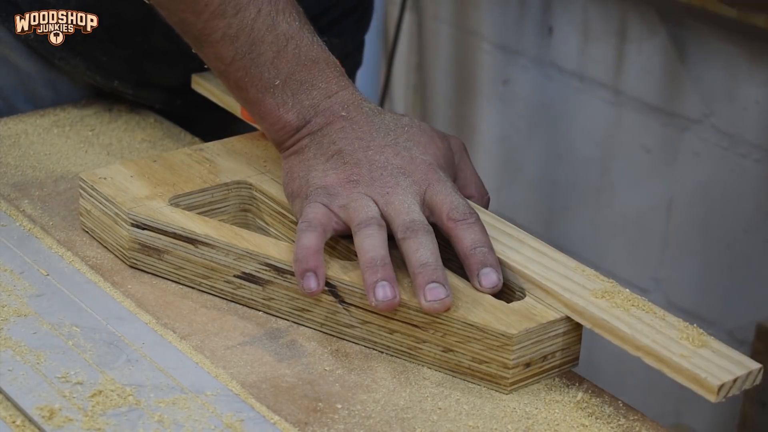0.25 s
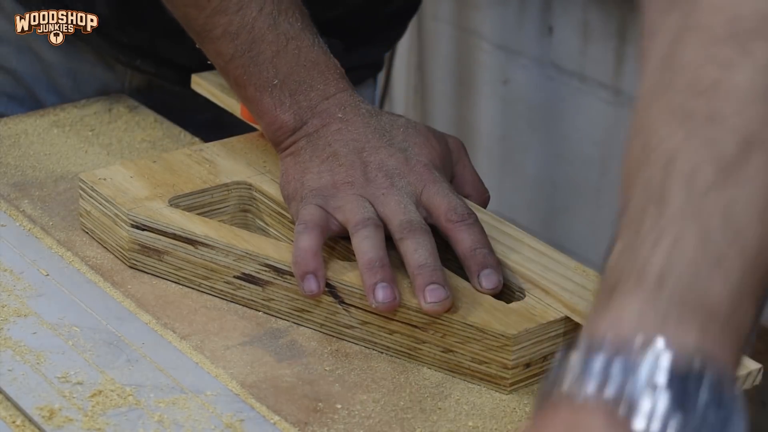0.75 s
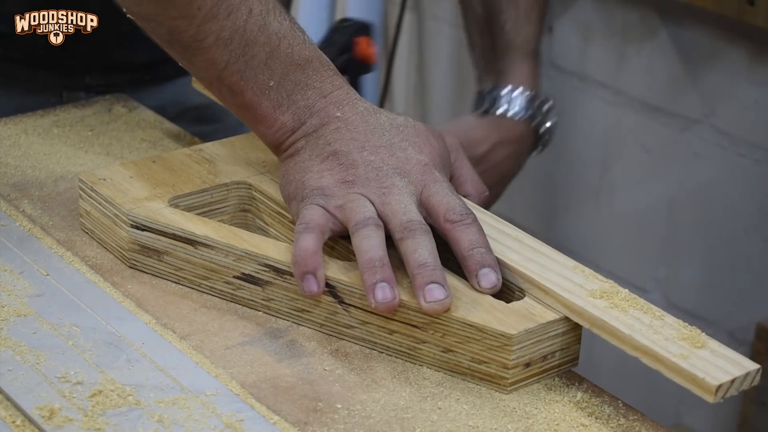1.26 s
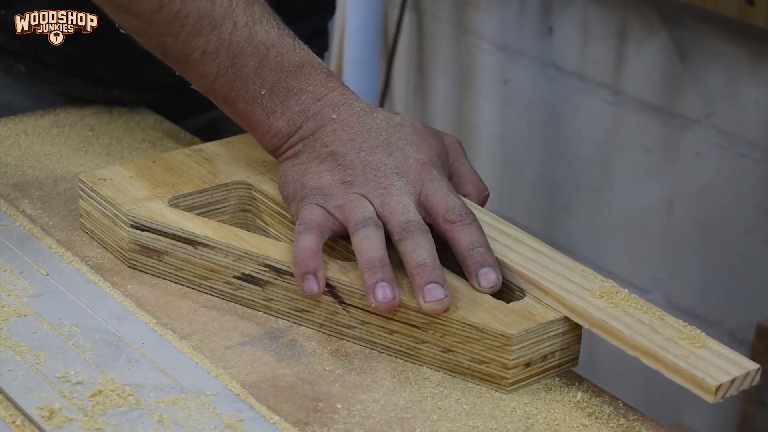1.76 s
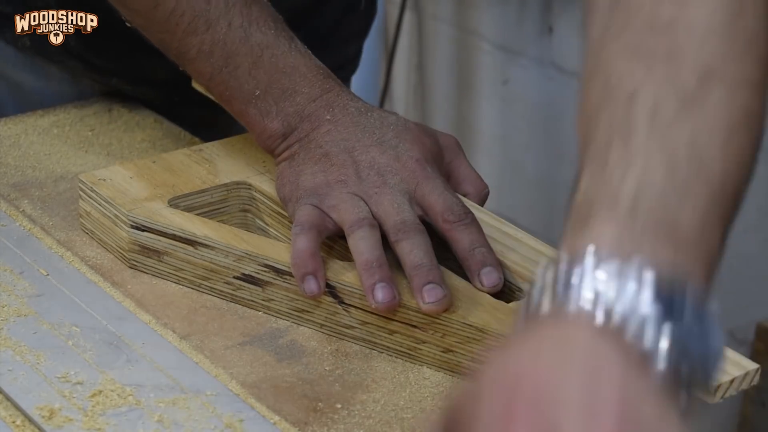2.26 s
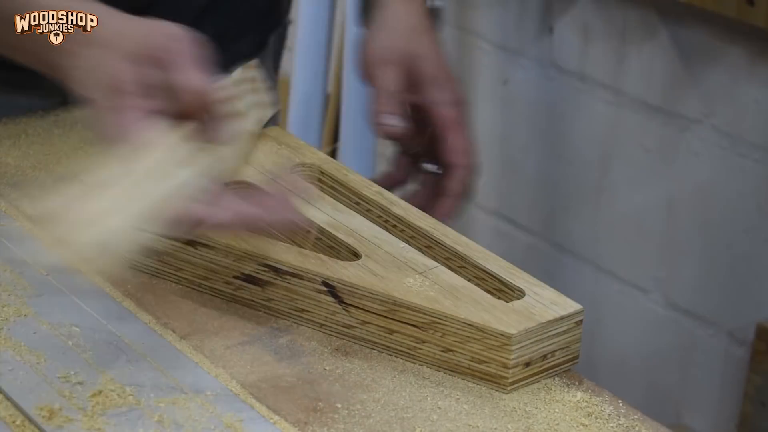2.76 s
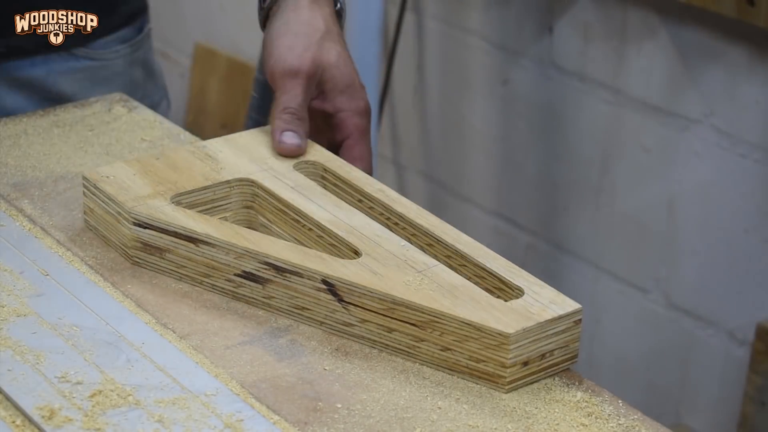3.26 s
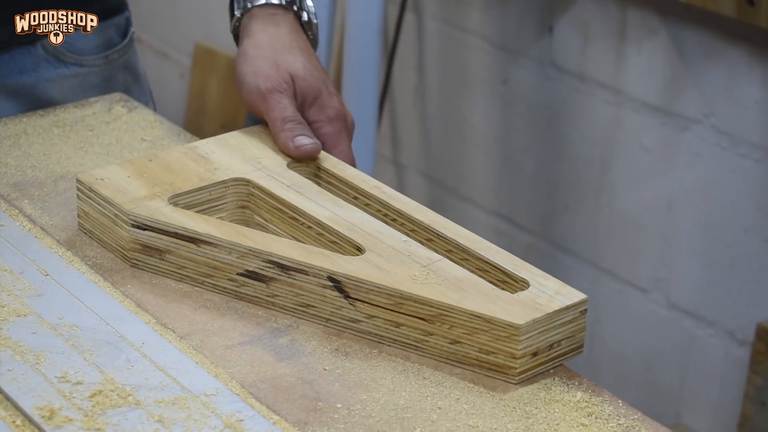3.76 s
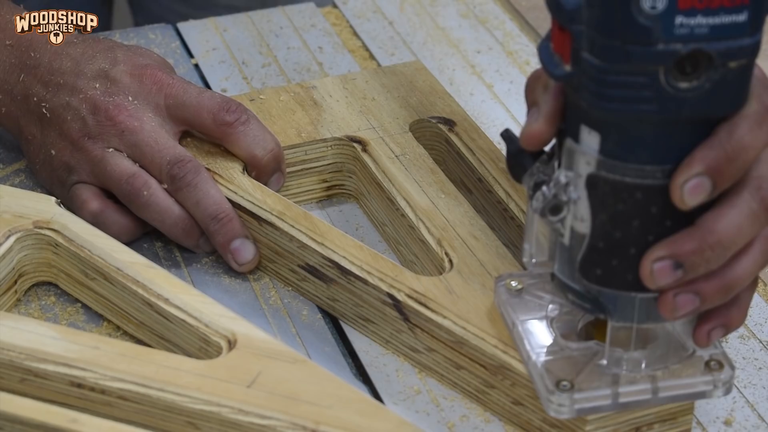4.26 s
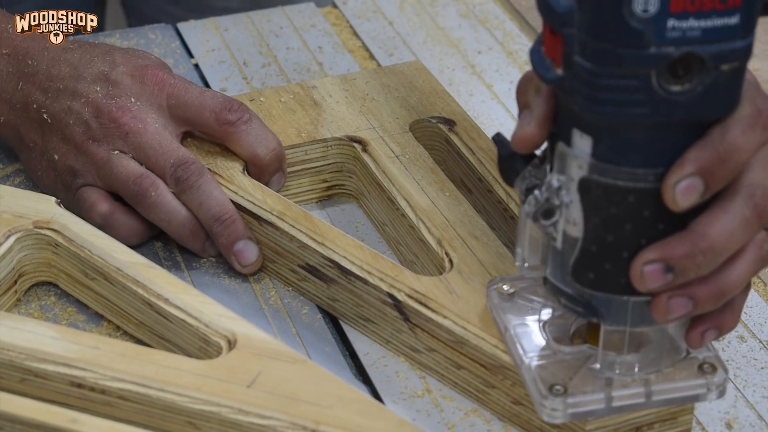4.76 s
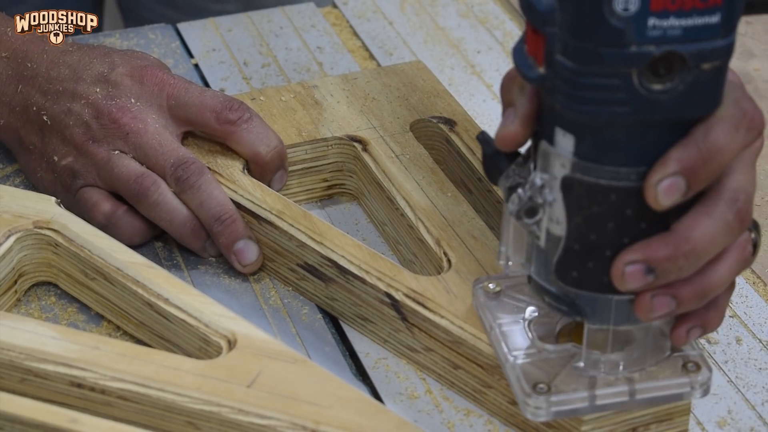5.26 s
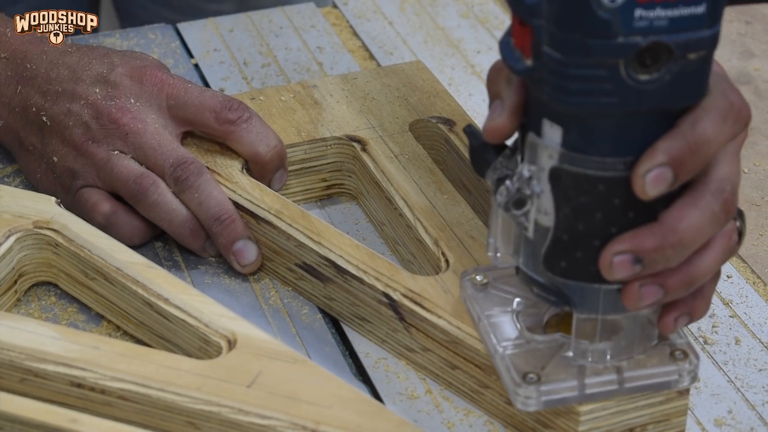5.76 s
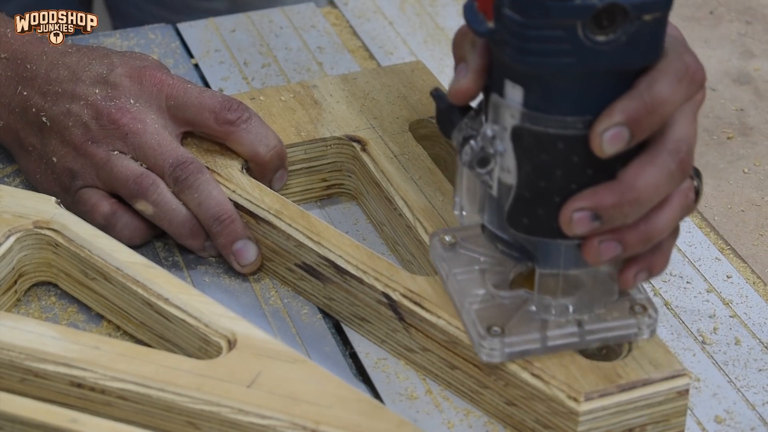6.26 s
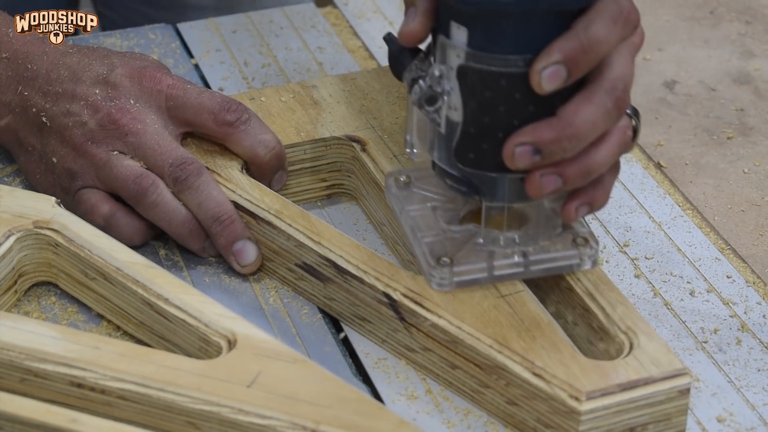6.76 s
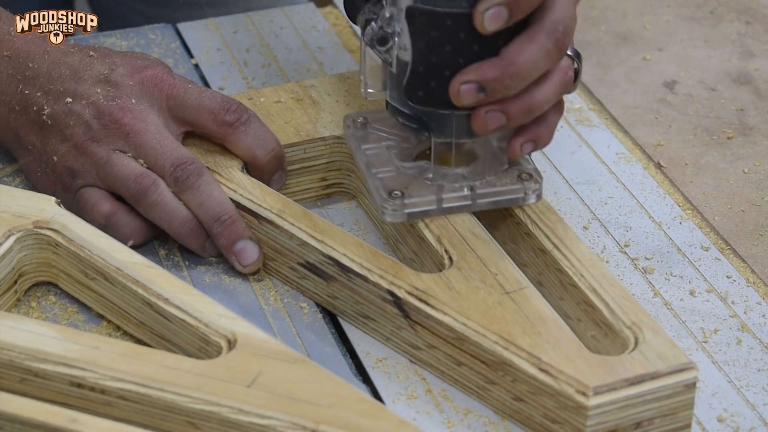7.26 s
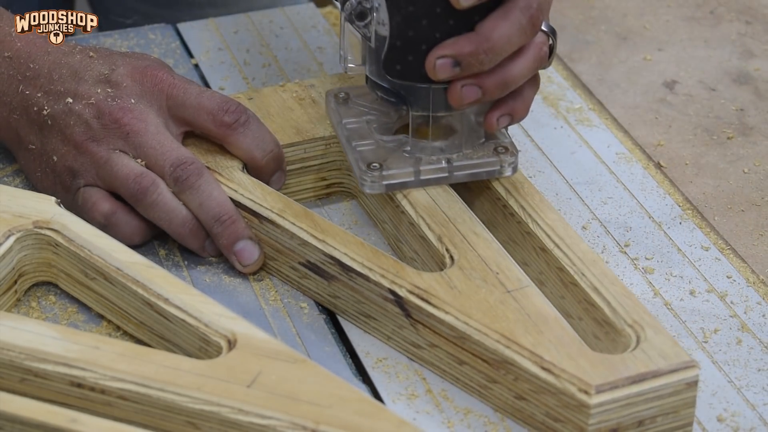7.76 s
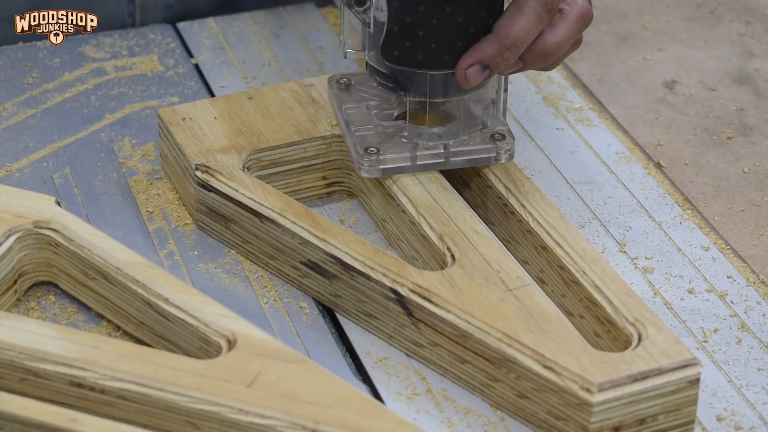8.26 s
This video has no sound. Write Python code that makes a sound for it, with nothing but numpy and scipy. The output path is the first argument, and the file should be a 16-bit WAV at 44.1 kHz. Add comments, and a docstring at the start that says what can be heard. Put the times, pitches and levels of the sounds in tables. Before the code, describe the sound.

A clamp bar clacks amid bursts of wooden knocks, hands brush plywood, then a router abruptly screams at high pitch before dropping into a falling run-down.

```python
"""Trim router in a workshop

At a workshop bench a clamp is let go, its bar clacking, and wood knocks, scrapes and is brushed by hands.
Knocks are noise bursts with a wall echo; scrapes are stick-slip pulses shaking a board's resonances.
Then a trim router whines along an edge: partials follow a shifting shaft speed over the hiss of chips.
The working whine breaks off and the run-down is heard from a third of that speed. One microphone, mono."""
import sys
import numpy as np
from scipy import signal
from scipy.fft import rfft, irfft, next_fast_len
from scipy.io import wavfile
from scipy.ndimage import map_coordinates

SR = 44100
rng = np.random.default_rng(int(sys.argv[2]) if len(sys.argv) > 2 else 0)


def bounce(signal):
    """Save signal as a 16-bit WAV file at the path given by the first command-line argument."""
    frames = np.transpose(np.atleast_2d(signal))
    limited = np.clip(frames, -1, 1)
    pcm = np.round(limited * 32767).astype(np.int16)
    wavfile.write(sys.argv[1], SR, pcm)


N = 374850

BREAK_S = 1.025  # knocks, scrapes and their echoes begun before this stop dead here
ON_S, WHINE_END_S = 4.228, 7.965  # the working whine begins and breaks off

# The whine's pitch sinks, climbs, dips and climbs again. Each row: time in seconds, shaft speed in Hz.
SHAFT_SPEED = [(4.25, 486.3), (4.49, 465.7), (4.73, 460.1), (5.2, 457.6), (5.68, 490.6), (5.8, 493.3),
               (5.92, 492.1), (6.27, 475.2), (6.63, 465.8), (6.99, 474), (7.46, 495), (7.94, 504.6)]
# Partials of the whine. Each row: order (multiple of shaft speed), rms level in dB with the router
# near the tip, rms level in dB at the far end of the edge; both before drift and standing waves.
WHINE_PARTIALS = [(2, -40.3, -41.5), (2.9964, -33.5, -41.5), (4.007, -40, -41.5), (5, -44.5, -37.5),
                  (6.002, -43.5, -53), (8, -47.5, -46), (12, -50, -48.5), (16, -46.5, -48),
                  (23.95, -61, -54)]
# The lowest partial, before its drift. Each row: time in seconds, rms level in dB.
FUNDAMENTAL_LEVEL = [(4.25, -42), (5.02, -43.5), (5.31, -51), (6.17, -45), (6.24, -56), (6.36, -49),
                     (6.84, -48.5), (7.15, -33), (7.26, -45), (7.33, -33.5), (7.82, -30), (7.94, -32)]
# The other partials, before the bench mix. Each row: frequency in Hz, amplitude in dB.
MOTOR_SPECTRUM = [(3200, -42.5), (3800, -30), (4400, -42.5), (5500, -42.5), (7000, -44.5), (9000, -46.5),
                  (10500, -53), (12500, -58), (15800, -69)]
# Colour of chips and cooling air. Each row: frequency in Hz, relative density in dB per Hz.
CHIP_SPECTRUM = [(60, -51), (130, -34), (200, -27.5), (320, -18.5), (520, -5.5), (900, 0), (1500, -1),
                 (2400, 2), (3600, 1.5), (5200, -3), (8700, -0.5), (10200, -12), (13000, -19), (15800, -24)]
# Level of that hiss, before its drift. Each row: time in seconds, rms level in dB.
HISS_LEVEL = [(4.25, -39.5), (4.6, -41), (5.2, -39), (5.3, -38.5), (6.95, -39), (7.15, -36.5)]
FAR_END_S, FAR_END_RAMP_S = 6.83, 0.28  # the router slides into its second position
FAR_MOTOR_DB = -4  # change of the other partials in that position


def router(count=33):
    """Partials at or near multiples of shaft speed glide through standing waves, over chip and air hiss."""
    speed, = curves(SHAFT_SPEED)
    far = np.clip((clock() - FAR_END_S) / FAR_END_RAMP_S, 0, 1)
    angle = 2 * np.pi * np.cumsum(speed * (1 + .0005 * drift(45))) / SR

    def partial(order):
        """One sine locked to the shaft, at a random phase."""
        return np.sin(order * angle + rng.uniform(0, 2 * np.pi))

    whine = np.zeros(N)
    for order, near_db, far_db in WHINE_PARTIALS:
        level_db = near_db + (far_db - near_db) * far + 1.8 * drift(20)
        whine += np.sqrt(2) * amp(level_db) * standing_waves(order * speed) * partial(order)
    lowest_db = curves(FUNDAMENTAL_LEVEL)[0] + 0.77 * drift(14)
    whine += np.sqrt(2) * amp(lowest_db) * partial(1)

    strong_orders = [row[0] for row in WHINE_PARTIALS]
    others = [order for order in range(2, count) if order not in strong_orders]
    motor = sum(amp(along(MOTOR_SPECTRUM, order * speed.mean())) * partial(order) for order in others)
    # near reflections make the gliding partials swell and drop out by turns
    bench = burst([(100, 0), (16000, 0)], t60=.17)
    reflected = signal.fftconvolve(motor, bench / np.linalg.norm(bench))[:N]
    motor = 0.38 * motor + 0.69 * reflected

    pulsing = rng.standard_normal(N) * (1 + 0.3 * np.sin(angle))  # once per turn
    hiss = filtered(pulsing, lambda hz: amp(along(CHIP_SPECTRUM, hz)))
    hiss = unit(hiss) * amp(curves(HISS_LEVEL)[0] + 0.74 * drift(6) + 0.23 * drift(30))
    return (whine + amp(FAR_MOTOR_DB * far) * motor + hiss) * during(ON_S, WHINE_END_S, 0.00089)


# Echo paths that change as the router moves.
# Each row: extra length in m, growth in m/s, reflected share before the common strength.
ECHO_PATHS = [(0.315, 0.124, 0.31), (0.849, 0.109, 0.23), (1.192, -0.084, 0.36), (3.581, 0.217, 0.4),
              (4.482, 0.135, 0.3), (6.367, -0.168, 0.17), (8.655, -0.037, 0.22), (12.277, -0.351, 0.17)]
PATHS_DB = 0.5  # common strength of these echoes


def standing_waves(hz):
    """Gain of a gliding tone that its own echoes reinforce and cancel by turns."""
    t, hz = clock()[::200], hz[::200]
    waves_per_m = hz / 343  # speed of sound in m/s
    echoes = 0
    for metres, growth, share in ECHO_PATHS:
        length = metres + growth * (t - ON_S)
        echoes = echoes + share * np.exp(-2j * np.pi * waves_per_m * length)
    return np.interp(clock(), t, np.abs(1 + amp(PATHS_DB) * echoes))


# Shaft, fan and commutator tones. Each row: order (multiple of shaft speed),
# amplitude in dB before housing, trim and run-down.
SPINNING_ORDERS = [(1, -63.5), (2, -71), (8, -57.5), (23, -51), (24, -42.5), (26, -51), (48, -47.5)]
# The motor housing colours the tones and buzz inside it. Each row: frequency in Hz, gain in dB.
HOUSING_GAIN = [(100, 0), (1300, 0), (2200, -4), (2850, -1), (3100, -9), (3750, 2), (4700, -7), (5700, 3),
                (6400, -1), (7200, -6), (8700, -4), (10500, -15), (16000, -20)]
# Colour of the bearing noise. Each row: frequency in Hz, relative density in dB per Hz.
BEARING_SPECTRUM = [(59, -46), (100, -30), (140, -7), (166, -19), (201, -40), (314, -11), (431, -14),
                    (479, -7), (1170, -3), (2110, -8), (3660, -8), (4530, -2), (5720, -9), (6770, -15),
                    (15800, -18)]
COAST_HZ, SLOWING_HZ_PER_S = 168, 101  # heard from a third of the working speed
COAST_DB, COAST_FADE_DB_PER_S = 3, 10.5


def coasting(count=110):
    """The shaft slows; its orders fall through the housing's resonances and beat with their echoes."""
    since = np.maximum(clock() - WHINE_END_S, 0)
    speed = COAST_HZ - SLOWING_HZ_PER_S * since
    level_db = COAST_DB - COAST_FADE_DB_PER_S * since
    tail = since > 0
    angle = 2 * np.pi * np.cumsum((speed * (1 + .0007 * drift(70)))[tail]) / SR

    def partial(order):
        """One order of the shaft, coloured by the housing."""
        sine = np.sin(order * angle + rng.uniform(0, 2 * np.pi))
        return amp(along(HOUSING_GAIN, order * speed[tail])) * sine

    tones, buzz = np.zeros((2, N))
    tones[tail] = sum(amp(db) * partial(order) for order, db in SPINNING_ORDERS)
    # brushes and bearings buzz at every multiple of the shaft speed from the fifth up
    buzz[tail] = sum(amp(rng.normal(-62.5, 4)) * partial(order) for order in range(5, count))
    tones = amp(-1.5) * tones * amp(2 * drift(25)) + amp(-6) * room(tones)
    buzz = amp(1.5) * buzz + amp(1.5 - 1.5) * amp(-9) * room(buzz)
    sound = tones + buzz + amp(-47) * noise(BEARING_SPECTRUM)
    return sound * amp(level_db) * during(WHINE_END_S, N / SR, .002)


# Wood knocking on wood. Each row: start in seconds, level in dB, then thud, body and crack in dB
# relative to that level (before each layer's trim), main resonance in Hz.
WOOD_KNOCKS = [(0.713, 2, -21, -8, -19, 1190), (0.740, -1, -30, -10, -15.5, 1450),
               (0.778, -8.5, -19, -6, -14, 1500), (0.854, -2, -16, -7, -30, 930),
               (0.861, -11, -25, -19, -12, 1200), (0.880, -9.5, -13, -9.5, -22, 545),
               (0.901, -11, -15.5, -8.5, -38, 810), (1.152, -38.5, -8, -5.5, -31, 905),
               (1.186, 0.5, -20.5, -10.5, -16.5, 707), (1.917, -34.5, -30, -7, -39, 1800),
               (2.143, -32.5, -34, -11, -11, 1070), (2.209, 1.5, -18, -10, -17.5, 1950),
               (2.228, 0, -18.5, -14, -14.5, 1760), (2.236, -1, -12, -8.5, -29, 440),
               (2.279, -3.5, -23, -9, -9.5, 1510), (2.331, -15, -17, -0.5, -30, 646),
               (2.381, -16, -9.5, -5.5, -32, 450), (2.582, -2.5, -13, -8, -24.5, 940),
               (2.665, -14, -14, -14, -20.5, 630), (3.632, -31, -3.5, -38, -40, 450)]


def knocks():
    """Each blow thuds in the bench, rings the wood around one main resonance and cracks at the contact."""
    out = np.zeros(N)
    grid = np.geomspace(30, SR / 2, 300)
    wood_db = along([(60, -64.5), (250, -2.5), (520, -0.5), (1100, -2), (2000, -5), (3200, -11.0),
                     (6000, -25.5), (12000, -77.5)], grid)
    thud_spectrum = [(30, -36.0), (110, -20), (215, 5), (370, 1.5), (650, -24), (2000, -66)]
    crack_spectrum = [(1500, -18), (4000, 7.5), (9000, 1.5), (15000, -20.5)]
    for s, db, thud_db, body_db, crack_db, ring_hz in WOOD_KNOCKS:
        peak_db = 10 / (1 + (np.log(grid / ring_hz) / 0.28) ** 2)
        body_spectrum = np.c_[grid, wood_db + peak_db]
        thud = blow(thud_spectrum, t60=0.053, echo_db=-8, echo_t60=0.46, attack_s=0.0018)
        body = blow(body_spectrum, t60=0.045, echo_db=-11.5, echo_t60=0.44, attack_s=0.00051)
        crack = blow(crack_spectrum, t60=0.043, echo_db=-11.5, echo_t60=0.37, attack_s=0.00018)
        sound = amp(db + thud_db + 1.5) * thud
        sound += amp(db + body_db + 3.5) * body
        sound += amp(db + crack_db - 2.0) * crack
        if s < BREAK_S:
            sound = sound[:round((BREAK_S - s) * SR)]
        add(out, s, sound)
    return out


def blow(spectrum, t60, echo_db, echo_t60, attack_s):
    """A short burst and its diffuse echo from the walls."""
    return burst(spectrum, t60, attack_s) + amp(echo_db) * burst(spectrum, echo_t60, attack_s=.003)


# Strokes of wood on wood. Each row: time of full strength in seconds, hold in seconds,
# judder level in dB, rasp level in dB.
WOOD_STROKES = [(0.777, 0.035, -21, -24), (2.256, 0.071, -23.5, -27.5)]
# Resonances of the scraped board. Each row: frequency in Hz, width in Hz, relative gain in dB.
BOARD_MODES = [(197, 53, 6), (377, 180, 4), (586, 85, 6.5), (853, 62, 3), (1060, 116, 2), (1520, 240, -3),
               (1880, 140, -7), (2600, 490, -5)]
# Colour of the dry rasp. Each row: frequency in Hz, relative density in dB per Hz.
RASP_SPECTRUM = [(710, -25.5), (1200, -13), (2240, -1), (2410, 19), (3760, -8), (4790, 2), (6310, -37.5),
                 (9520, -29), (10900, -39), (15000, -44)]
SCRAPE_ATTACK_S = 0.05
JUDDER_FADE_DB_PER_S, RASP_FADE_DB_PER_S = 146, 480  # as the push eases the rasp dies first


def scrapes():
    """Wood sticks and slips with uneven strength: the slips shake the board and gate a dry rasp."""
    turns = np.cumsum(280 * np.exp(.4 * drift(150))) / SR  # the slip rate varies around 280 Hz by draw
    slips = np.diff(np.floor(turns), prepend=0) * amp(2.5 * rng.standard_normal(N))
    grip = unit(signal.lfilter([1], [1, -np.exp(-1 / (0.0094 * SR))], slips))  # 9.4 ms decay constant
    push = grip * noise([(40, -34), (110, 10.5), (200, 2.5), (5000, 3.0), (12000, -23.0)])
    judder = unit(filtered(push, resonances(BOARD_MODES)))
    rasp = grip * noise(RASP_SPECTRUM)
    out = np.zeros(N)
    for s, held_s, judder_db, rasp_db in WOOD_STROKES:
        sound = amp(judder_db) * judder * stroke(s, held_s, SCRAPE_ATTACK_S, JUDDER_FADE_DB_PER_S)
        sound += amp(rasp_db) * rasp * stroke(s, held_s, SCRAPE_ATTACK_S, RASP_FADE_DB_PER_S)
        if s < BREAK_S:
            sound *= clock() < BREAK_S
        out += sound
    return out


# The jaw sliding on its bar, before trim and drift. Each row: time in seconds, level in dB.
JAW_SLIDE = [(1.29, -59), (1.35, -35.5), (1.415, -46), (1.45, -27.5), (1.48, -26), (1.499, -24.5)]
# Colour of that slide. Each row: frequency in Hz, relative density in dB per Hz.
BAR_SPECTRUM = [(180, -57.5), (300, -30), (568, -6), (869, -11), (1370, -4), (2100, -9.5), (7180, -16.5),
                (15000, -40)]
# The steel bar clacking. Each row: start in seconds, level in dB, then body and tick (before their
# trims) and echo in dB relative to that level.
BAR_CLACKS = [(0.002, -15.5, -22, -18, -3.5), (1.375, -21.5, -17, -15.5, -33),
              (1.498, 0.5, -12, -13, -17.5), (1.734, -26, -3, -18, -16.5), (2.019, -41, -30, -9, -21)]
# Modes of the bar. Each row: frequency in Hz, relative level in dB, 60 dB decay time in seconds.
STEEL_MODES = [(3149, -3, .15), (3714, -4, .15), (7892, -3, .15), (9950, -2, .28), (13400, -10, .24)]
# Colour of the clack's echo. Each row: frequency in Hz, relative density in dB per Hz.
CLANG_SPECTRUM = [(100, -33.5), (300, -14.5), (700, -9.5), (1300, 0.5), (2200, 0.5), (3000, 3.5),
                  (4200, -2), (5500, -5), (8500, -11.5), (11500, -23.5), (15500, -34)]


def clamp():
    """The jaw slides along the steel bar and clacks against its stop; a diffuse echo joins each clack."""
    slide_db = curves(JAW_SLIDE)[0] - 2.5 + 1.6 * drift(90)
    out = amp(slide_db) * noise(BAR_SPECTRUM) * during(JAW_SLIDE[0][0], JAW_SLIDE[-1][0], 0.0052)
    body_spectrum = [(100, -39), (350, -31), (800, -10), (1300, -1), (3000, -9), (4500, -5), (8000, -31.5)]
    for s, db, body_db, tick_db, echo_db in BAR_CLACKS:
        body = burst(body_spectrum, t60=0.041)
        tick = burst([(2500, -32), (5500, 7.0), (9000, 7), (15000, -18)], t60=0.033)
        tick += amp(-22) * ring(STEEL_MODES)
        shimmer = burst([(3000, -25), (6000, 7), (9500, 4.5), (15000, -14.5)], t60=0.22)
        bright = tick + amp(-14.5) * shimmer
        add(out, s, amp(db + body_db - 0.5) * body + amp(db + tick_db + 4.0) * bright)
        add(out, s, amp(db + echo_db) * burst(CLANG_SPECTRUM, t60=0.33))
    return out


# Light touches on steel. Each row: start in seconds, level in dB before the trim.
STEEL_TOUCHES = [(0.27, -46)]
# Modes they ring. Each row: frequency in Hz, relative level in dB, 60 dB decay time in seconds.
TOUCH_MODES = [(6270, 3, 0.054), (6580, 0, 0.098), (11200, -15, .08), (14700, -16, .06)]


def pings():
    """A light touch rings only high modes of the steel."""
    out = np.zeros(N)
    for s, db in STEEL_TOUCHES:
        add(out, s, amp(db - 3.5) * ring(TOUCH_MODES))
    return out


# Strokes of a hand or sleeve. Each row: time of full strength in seconds, hold in seconds,
# rub level in dB, swish level in dB, both before drift.
HAND_STROKES = [(0.45, 0.1, -80, -65.5), (0.64, 0.05, -58.5, -56), (1.93, 0.064, -69, -60.5),
                (2.18, 0.02, -73, -53.5), (2.73, 0.17, -60, -47), (3.08, 0.037, -53.5, -55.5),
                (3.2, 0.009, -55, -51.5), (3.29, 0.096, -57.5, -57.5), (3.44, 0.036, -51, -51.5),
                (3.6, 0.038, -60, -54.5), (3.72, 0.085, -58, -54.5), (3.975, 0.03, -85, -51),
                (4.07, 0.069, -77, -53.5), (4.21, 0.011, -55.5, -62)]
# Colour of the low rub. Each row: frequency in Hz, relative density in dB per Hz.
RUB_SPECTRUM = [(59, -38), (100, -14), (211, -3), (481, -7), (767, -10.5), (1120, -19), (1200, -7),
                (1560, -55.5), (2640, -120)]
# Colour of the bright swish. Each row: frequency in Hz, relative density in dB per Hz.
SWISH_SPECTRUM = [(410, -32), (700, -4.5), (1410, -0.5), (1500, -3), (1920, -2), (2630, 0), (2950, -5),
                  (3680, 0), (4130, -1.5), (8430, -5), (15500, -28.5)]
# Narrow resonant peaks in the swish. Each row: frequency in Hz, width in Hz, relative gain in dB.
SWISH_PEAKS = [(1540, 40, 0), (1780, 70, -11), (2620, 110, -6), (3590, 110, -6), (4640, 250, -8),
               (5800, 110, -7), (6830, 430, -9)]
BRUSH_ATTACK_S = 0.077
RUB_FADE_DB_PER_S, SWISH_FADE_DB_PER_S = 111, 79.5


def hands():
    """Palms and sleeves brush the plywood as coloured noise; narrow bands of noise colour the swish."""
    bands = np.zeros(N)
    for peak in SWISH_PEAKS:
        bands += amp(6 * drift(5)) * filtered(rng.standard_normal(N), resonances([peak]))
    rub = noise(RUB_SPECTRUM) * amp(1.5 * drift(40))
    swish = noise(SWISH_SPECTRUM) * amp(2.2 * drift(70) - 0.5) + unit(bands)
    rubbing, swishing = np.zeros((2, N))
    for s, held_s, rub_db, swish_db in HAND_STROKES:
        rub_stroke = amp(rub_db) * stroke(s, held_s, BRUSH_ATTACK_S, RUB_FADE_DB_PER_S)
        swish_stroke = amp(swish_db) * stroke(s, held_s, BRUSH_ATTACK_S, SWISH_FADE_DB_PER_S)
        # the stronger of overlapping strokes wins
        rubbing = np.maximum(rubbing, rub_stroke)
        swishing = np.maximum(swishing, swish_stroke)
    return (rubbing * rub + swishing * swish) * (clock() < ON_S)


def stroke(s, held_s, attack_s, fade_db_per_s):
    """A gesture swells to full strength at time s, holds and fades."""
    rise = np.clip((clock() - s) / attack_s + 1, 0, 1)
    return rise ** 2 * amp(-fade_db_per_s * np.maximum(clock() - s - held_s, 0))


# Decay of the workshop. Each row: frequency in Hz, 60 dB decay time in seconds.
ROOM_DECAY = [(100, 0.21), (400, 0.47), (1000, 0.34), (3000, 0.15), (8000, 0.38), (15000, 0.083)]


def room(x):
    """The walls' answer, each frequency dying at its own speed."""
    hz, t, z = signal.stft(rng.standard_normal(SR * 3 // 4), SR, nperseg=256)
    fall = amp(-60 * t / along(ROOM_DECAY, hz)[:, None]) * (1 - np.exp(-t / .008))
    tail = signal.istft(z * fall, SR, nperseg=256)[1]
    return signal.fftconvolve(x, tail / np.linalg.norm(tail))[:N]


# Colour of the still room. Each row: frequency in Hz, relative density in dB per Hz.
AIR_SPECTRUM = [(20, 15), (60, 3), (120, -2.5), (220, 0.5), (600, 1), (1700, -3), (3000, -12.5),
                (8000, -19.5), (16000, -24)]


def air():
    """Steady coloured noise of the room, present until the router starts."""
    return amp(-56.5) * noise(AIR_SPECTRUM) * (clock() < ON_S)


def amp(db):
    """Decibels to gain."""
    return 10 ** (np.asarray(db) / 20)


def unit(x):
    """Scale to rms 1."""
    return x / np.sqrt(np.mean(x ** 2) + 1e-20)


def clock():
    """Time of each sample in seconds."""
    return np.arange(N) / SR


def along(points, hz):
    """Interpolate (Hz, value) points on a log frequency axis."""
    f, v = np.transpose(points)
    return np.interp(np.log(hz + 1), np.log(f + 1), v)


def curves(rows):
    """One value per sample for each column after the time."""
    s, *cols = np.transpose(rows)
    return [np.interp(clock(), s, c) for c in cols]


def during(start, end, fade):
    """1 between two times, with ramps outside them."""
    return np.clip(np.minimum(clock() - start, end - clock()) / fade + 1, 0, 1)


def drift(rate):
    """A random value that barely moves: rate / SR knots of a smooth curve a second."""
    knots = rng.standard_normal(int(N * rate / SR) + 4)
    t = clock()[::50]
    return np.interp(clock(), t, map_coordinates(knots, [t * rate / SR]))


def filtered(x, response):
    """x times a response of frequency."""
    size = next_fast_len(len(x) + 8192)
    return irfft(rfft(x, size) * response(np.fft.rfftfreq(size, 1 / SR)), size)[:len(x)]


def noise(spectrum, size=N):
    """Coloured noise of rms 1."""
    return unit(filtered(rng.standard_normal(size), lambda hz: amp(along(spectrum, hz))))


def burst(spectrum, t60, attack_s=.0001):
    """Densely packed modes that start together and die."""
    t = np.arange(SR // 2) / SR
    fall = amp(-60 * t / t60) * (1 - np.exp(-t / attack_s))
    return unit(noise(spectrum, size=len(fall)) * fall) * np.sqrt(np.mean(fall ** 2))


def ring(modes):
    """Distinct modes, struck at new strengths each time."""
    t = np.arange(SR // 2) / SR
    out = np.zeros(len(t))
    for hz, db, t60 in modes:
        fall = amp(db + rng.normal(0, 1.16) - 60 * t / t60)
        out += fall * np.sin(2 * np.pi * hz * t) * rng.choice([-1, 1])
    return out


def resonances(peaks):
    """The response of a few (Hz, width, dB) resonances of alternating sign."""
    def response(f):
        """Sum of the band-pass peaks at frequencies f."""
        total = 0
        for k, (centre, width, db) in enumerate(peaks):
            damping = 1j * f * width
            total = total + (-1) ** k * amp(db) * damping / (centre * centre - f * f + damping)
        return total
    return response


def add(track, s, sound):
    """Mix a sound in at time s."""
    part = track[max(round(s * SR), 0):][:len(sound)]
    part += sound[:len(part)]


def scene():
    """Handwork in the room, then the machine."""
    rubbing = scrapes()
    early = clock() < BREAK_S
    echo = amp(-3) * (room(rubbing * early) * early + room(rubbing * ~early))
    handwork = knocks() + rubbing + echo + clamp() + pings() + hands()
    return (handwork + air() + router() + coasting())[None]


TOP_HZ = 15900  # band limit


def record(dry):
    """The loudest peaks clip softly; the deep bass is thinned and nothing passes the band limit."""
    clipped = dry[0] / (1 + np.abs(dry[0] / .85) ** 6) ** (1 / 6)
    thinned = signal.sosfilt(signal.butter(1, 55, "high", fs=SR, output="sos"), clipped)
    return filtered(thinned, lambda hz: np.clip((TOP_HZ - hz) / 300 + .5, 0, 1))[None]


dry = scene()
out = record(dry)
bounce(out)
```